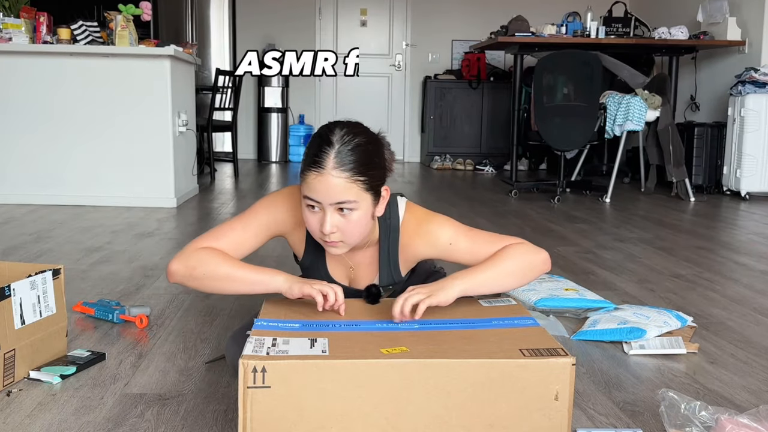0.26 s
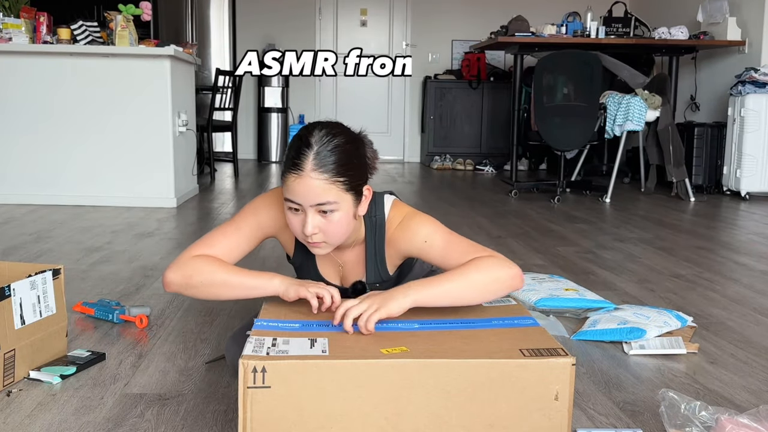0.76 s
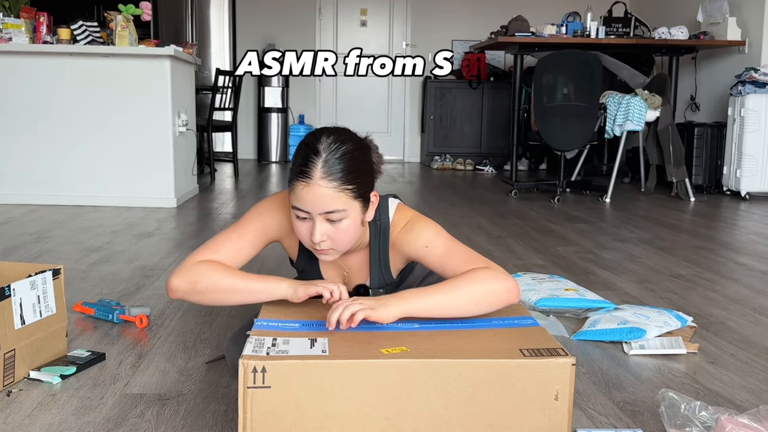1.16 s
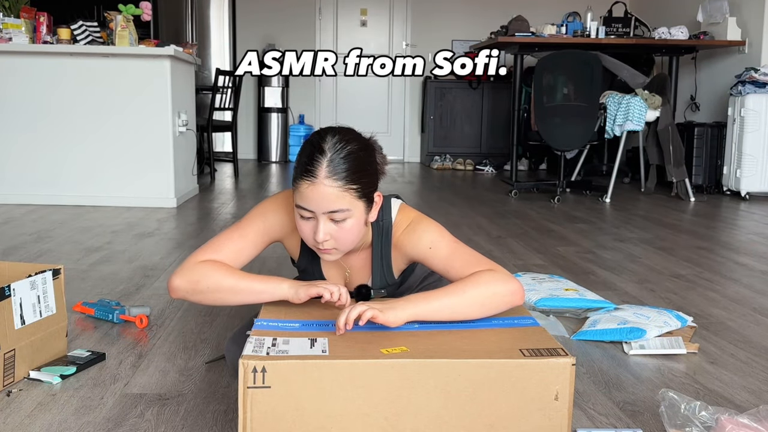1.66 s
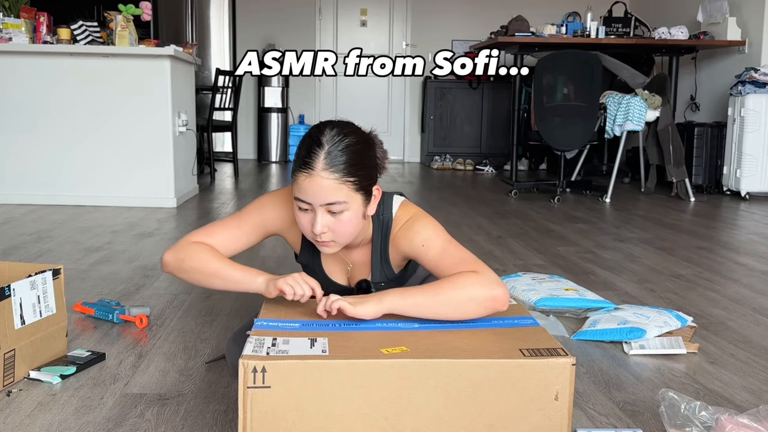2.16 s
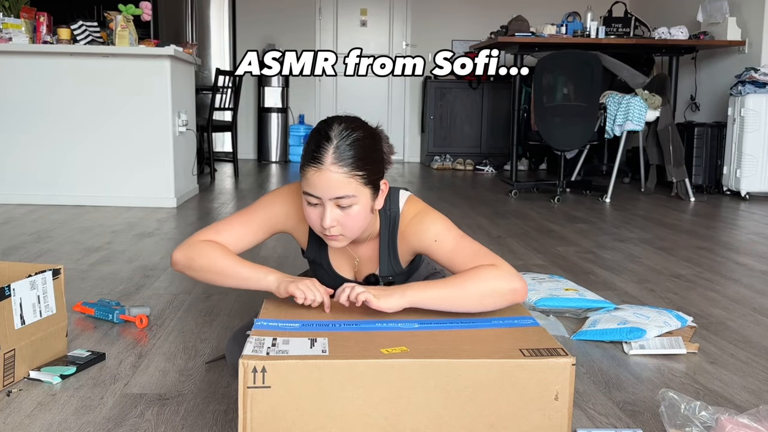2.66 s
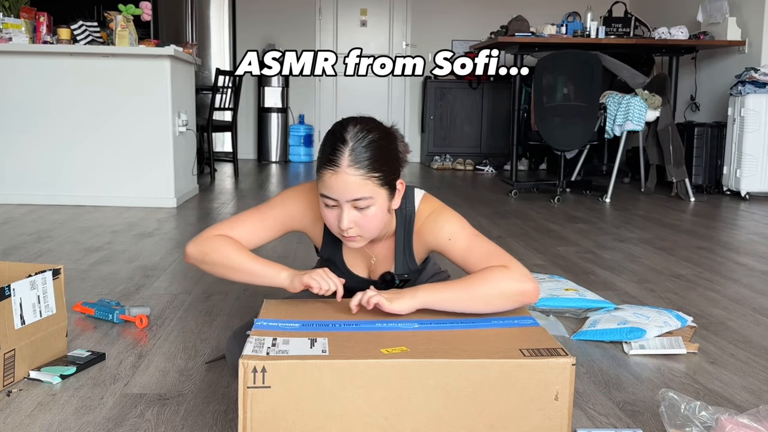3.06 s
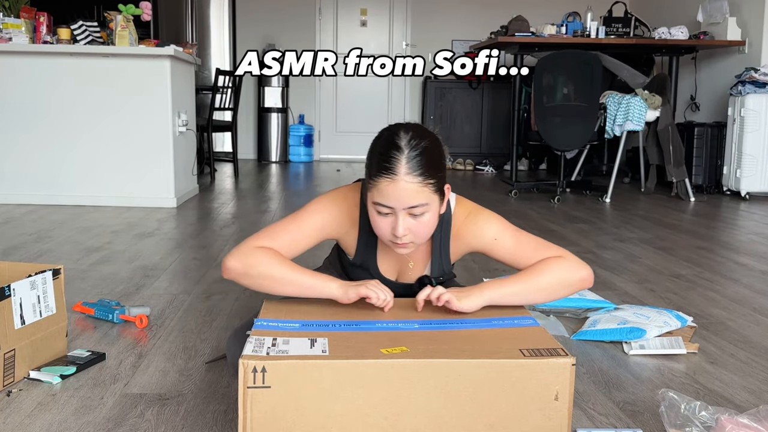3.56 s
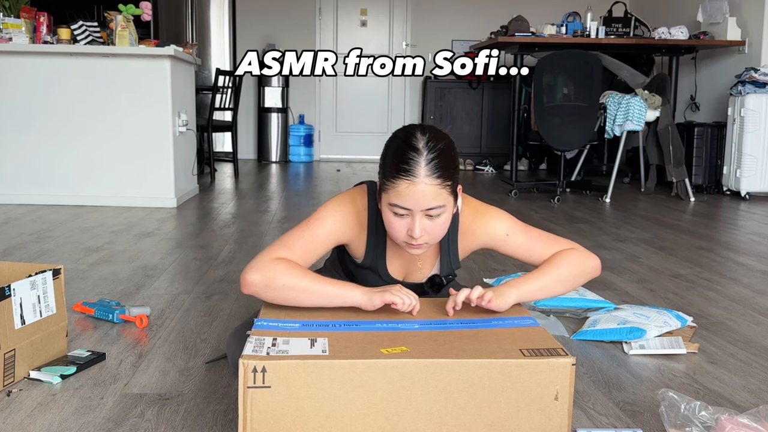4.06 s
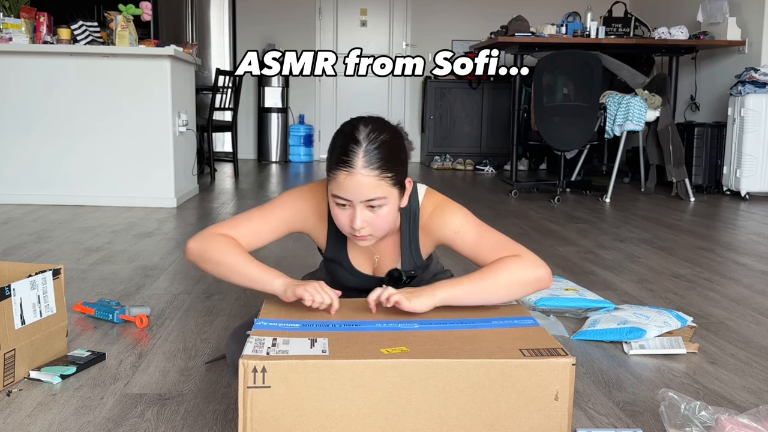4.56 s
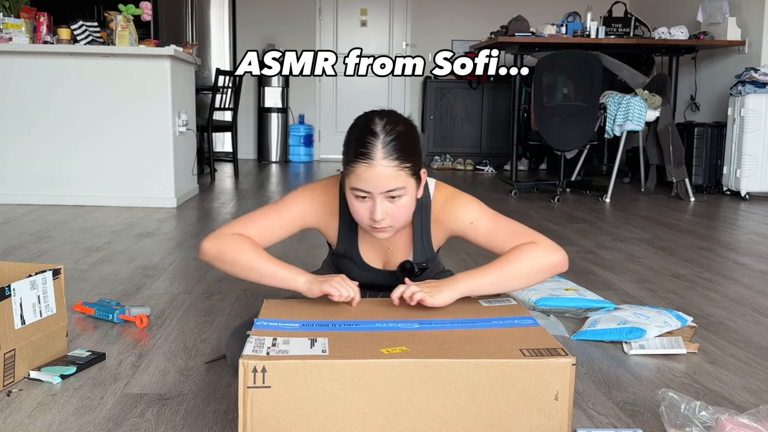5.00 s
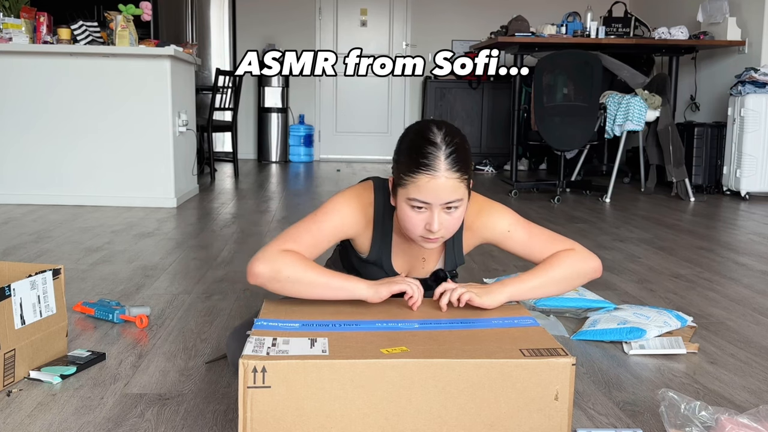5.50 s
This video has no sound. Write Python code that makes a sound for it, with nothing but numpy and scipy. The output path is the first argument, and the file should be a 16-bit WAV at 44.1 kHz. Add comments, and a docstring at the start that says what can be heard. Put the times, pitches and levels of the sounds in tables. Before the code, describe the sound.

Fingertips and nails drum hollow thumps on a large cardboard box, scratch back and forth over its ridges, then tap again, very close.

```python
"""Drumming and scratching on a cardboard box

Fingertips and nails drum on a large cardboard box, right at the microphone, in a quiet room.
Each tap dents the lid with a thump and a nail click and sets the box ringing; fingers brush the tape between.
Then the nails scratch to and fro, bumping over the flutes of the corrugated board, and the tapping starts again.
Thumps and ringing are struck resonances; brushes, drags and scratches are coloured random snaps of paper fibre."""
import sys
import numpy as np
from scipy import signal
from scipy.fft import rfft, irfft
from scipy.io import wavfile
from scipy.ndimage import uniform_filter1d

SR = 44100
rng = np.random.default_rng(int(sys.argv[2]) if len(sys.argv) > 2 else 0)


def bounce(signal):
    """Save signal as a 16-bit WAV file at the path given by the first command-line argument."""
    frames = np.transpose(np.atleast_2d(signal))
    limited = np.clip(frames, -1, 1)
    pcm = np.round(limited * 32767).astype(np.int16)
    wavfile.write(sys.argv[1], SR, pcm)


N = 252974
TIME = np.arange(N) / SR   # seconds

# taps on the lid: start_s, thump_peak_db, lid_pitch_hz, damping_octaves (width of the lid's resonance),
# click_db, click_brightness_hz (low-pass corner)
TAPS = [(.0065, -24.5, 326, 1.3, -43, 4000), (0.035, -21.5, 405, 1.38, -25, 4000),
        (.079, -20.5, 186, 1.13, -27, 4000), (0.2007, -18.5, 200, 0.77, -24.5, 3500),
        (0.2089, -21.5, 350, 0.76, -27, 2500), (0.336, -42, 270, 0.88, -53, 3020),
        (0.3816, -21.5, 336, 1.33, -20.5, 1980), (0.4288, -21, 250, 1.26, -34, 6000),
        (0.4598, -28.5, 298, 1.16, -44, 6000), (0.5664, -28, 348, 0.99, -35, 2520),
        (0.6899, -17.5, 280, 1.5, -22, 2960), (0.71, -26.5, 302, 1.4, -26, 3000),
        (.781, -25.5, 380, 1.16, -24, 4030), (.794, -32, 290, 0.73, -53, 2980),
        (0.9207, -21.5, 310, 1.07, -28, 2500), (0.9311, -22.5, 338, 0.72, -24.5, 5000),
        (1.0653, -14, 237, 1.23, -25.5, 3960), (1.1197, -30.5, 392, 1.1, -31, 6000),
        (1.3036, -12, 223, 1.29, -20, 1960), (1.4235, -19, 286, 0.49, -27.5, 7140),
        (1.507, -8.5, 232, 1.36, -15.5, 2950), (1.5912, -25.5, 310, 0.62, -30.5, 5040),
        (1.6755, -11, 243.4, 1.3, -17.5, 2950), (1.7752, -19, 290, 0.57, -22.5, 7100),
        (1.822, -11, 266, 1.24, -16.5, 2920), (2.2154, -23.5, 374, 1.38, -23, 7000),
        (2.636, -43, 220, 0.72, -41, 7000), (3.0418, -23.5, 239, 1.53, -33, 2000),
        (3.3978, -32, 370, 2.2, -55, 3020), (5.531, -29, 313, 1.42, -33.5, 5060),
        (5.6192, -22.5, 290, 0.85, -30.5, 8150), (5.6624, -15.5, 247, 1.8, -23.5, 11900),
        (5.7147, -20.5, 266, 1.36, -24.5, 9000), (5.7268, -12, 230, 1.7, -22, 14000)]
# modes of the ringing box: mode_hz, relative_level_db, t60_s
BOX_MODES = [(58.7, -32, 0.41), (86, -9, 0.19), (118.8, 7, 0.065), (167.6, -8.5, 0.22), (208.3, 8.5, 0.061),
             (256.2, 8, 0.058), (283.7, -18.5, 0.29), (326, -13, 0.054), (400, -12.5, 0.055),
             (451, 1.5, 0.068), (500, -13.5, 0.096), (632, -29, 0.11), (735, -24, 0.075), (866, -13, 0.047)]
# colour of a nail click: frequency_hz, relative_level_db
NAIL_COLOUR = [(300, -11.5), (800, -9.5), (1450, 7.5), (1700, 1), (2100, 2), (2400, 4), (3100, 3),
               (4000, -4.5), (5300, -8), (7200, -7), (10000, -18), (15000, -16.5)]

# scratches across the flutes; a nail that runs along them is hardly jolted: start_s, fastest_s, end_s,
# end_speed_flutes_per_s, top_speed_flutes_per_s, jolt_db (scaled per layer), pressure_db (upward tilt),
# then relative levels at top speed: board_db, rasp_db, hiss_db
SCRATCHES = [(2.284, 2.43, 2.499, 21.7, 38.4, 4.2, 0, -43.5, -54, -66),
             (2.498, 2.544, 2.593, 30.6, 34.4, 4.5, 0, -39.5, -54, -64.5),
             (2.68, 2.77, 2.815, 12.8, 29.7, .2, .3, -42, -53.4, -65.5),
             (2.853, 2.901, 2.947, 15.8, 29.5, .2, .5, -40.5, -54, -64.5),
             (2.98, 3.006, 3.06, 21.9, 28.5, .2, .6, -38, -56, -62.5),
             (3.074, 3.128, 3.454, 38.9, 39.9, 3.5, 1, -45, -58.5, -69.5),
             (3.451, 3.468, 3.995, 26.1, 44.1, 3.9, 3, -41.5, -53.3, -63.3),
             (4.133, 4.447, 4.679, 28.3, 61.7, 3.2, 6, -38.7, -48.6, -60.5),
             (4.682, 4.707, 4.778, 22.9, 25, 3, 0, -42, -59, -67.5),
             (4.887, 5.041, 5.46, 26.8, 38.6, 3.1, 8, -39, -50, -62.4)]
# strokes of the hand, one or more scratches each, with the spot they meet: from_s, panel_hz, panel_boost_db,
# rasp colour as pairs of frequency_hz, relative_level_db
STROKES = [(2.201, 475, 7, [(650, -31), (1100, 1.5), (1200, -24), (1230, 5.5), (1300, -1.5), (1610, 0.5),
           (1740, -5), (1920, 4), (2300, 1), (3660, -17.5), (4450, -15), (4840, -18), (5800, -26),
           (7540, -53), (12800, -120)]), (2.63, 510, 2.5, [(650, -29), (1100, 2), (1210, -4), (1460, 5.5),
           (1600, -6), (1680, -14), (1830, 4), (1930, 3), (2140, -1.5), (3230, -4.5), (3470, -3),
           (3870, -11), (4240, -6), (4640, -11.5), (5800, -14), (7540, -56), (12800, -120)]),
           (3.05, 940, 2, [(650, -22), (1100, 5), (1260, -22), (1390, 3), (1570, -1), (1740, 0),
           (2030, -4.5), (2380, -5), (2530, -9), (3040, -1.5), (4240, -9), (4740, -3.5), (5800, -20),
           (7540, -39), (12800, -120)]), (3.46, 600, 4.5, [(650, -13), (1100, 0), (1320, -2), (1680, -12),
           (1770, -13), (2000, -6.5), (2220, -9.5), (2550, -14), (2950, -7), (3390, -10), (3960, -16.5),
           (4640, -14), (5800, -24), (7540, -49), (12800, -120)]), (4.08, 515, 3.5, [(650, -54), (1100, 4),
           (1280, -7), (1510, -8), (1770, 1), (2090, -3), (2280, 3.5), (2760, -0.5), (3120, 1.5),
           (3720, -5), (4550, -11.5), (5340, -12), (5800, -16), (7540, -55), (12800, -120)]),
           (4.82, 615, 5.5, [(650, -17), (1100, -2), (1150, -4.5), (1430, 4.5), (1580, -3.5), (2070, -4.5),
           (2300, -6), (2480, -9), (2910, -4.5), (3210, -14.5), (3820, -13.5), (4300, -16), (4710, -23),
           (5230, -23), (5800, -29), (7540, -63), (12800, -120)])]
# friction colour of the drumming board: frequency_hz, relative_level_db (per Hz)
BOARD_COLOUR = [(21, -49), (35, -38), (85, -13), (117, -8), (177, -4), (286, 3), (438, -4), (494, -0.5),
                (541, -8), (668, -9), (789, -13), (904, -8.5), (1120, -25), (1300, -24.5), (1690, -31.5),
                (2860, -120)]
# friction colour at the nail's edge: frequency_hz, relative_level_db (per Hz)
HISS_COLOUR = [(3240, -24), (5500, 0.5), (8000, -5), (11300, -14.5), (13600, -13), (15600, -18)]

# short brushes of a nail over the packing tape: centre_s, half_length_s, level_db
BRUSHES = [(0.302, 0.006, -55), (0.441, 0.022, -47.5), (0.499, 0.0058, -47), (0.726, 0.021, -58.5),
           (0.785, 0.029, -57), (0.893, 0.0099, -54), (1.018, 0.01, -51.5), (1.145, 0.0092, -54.5),
           (1.871, 0.0058, -57.5), (2.232, 0.003, -49.5), (5.684, 0.0053, -61)]
# tiny tones: centre_s, half_length_s, pitch_hz, level_db; the first is a brief 2240 Hz ring just after the tap
# at 0.079 s, the second a squeak as the nail catches on the tape
TONES = [(.0803, .002, 2240, -36), (.449, .015, 3120, -48)]
# friction colour of the tape: frequency_hz, relative_level_db (per Hz)
TAPE_COLOUR = [(410, -60.5), (700, 6), (968, 1), (1210, -8), (2220, -8.5), (2630, -13), (3070, -5.5),
               (3370, -11.5), (6030, -22), (7620, -19.5), (15600, -37)]

# light fingertip drags among and under the taps and scratches: centre_s, half_length_s,
# then relative levels: board_db, rasp_db, hiss_db
DRAGS = [(.01, 0.078, -38, -55, -61), (.11, .13, -54.5, -63, -62.5), (.3, 0.11, -50.5, -63.5, -65.5),
         (.52, 0.078, -46.5, -67, -66), (.74, 0.097, -40.5, -71, -75), (1.08, 0.16, -53.5, -73, -72),
         (1.97, 0.12, -58, -72.5, -71.5), (2.27, 0.042, -45.5, -68, -72), (2.675, 0.033, -50, -63.5, -69),
         (3.02, 0.019, -48, -76, -57), (3.69, 0.038, -54, -55.5, -61), (4.06, 0.33, -51.5, -67.5, -62),
         (4.12, 0.02, -44.5, -85, -78), (4.85, 0.072, -45.5, -71.5, -67.5), (5.45, 0.0088, -45, -52, -50),
         (5.505, 0.022, -46.5, -74, -67)]
# rasp colour of a light drag: frequency_hz, relative_level_db (per Hz)
DRAG_RASP_COLOUR = [(680, -50), (1150, 3.5), (1550, -2), (1960, -0.5), (3200, -1), (3510, -5.5),
                    (3840, -0.5), (5800, -14.5), (7540, -46), (12800, -120)]

# forearms leaning and shifting on the lid: centre_s, half_length_s, rumble_db
LEANS = [(.1, 0.7, -62), (2.75, 0.23, -75), (3.4, 0.48, -77), (4.5, 0.29, -58.5)]
# colour of the room's answer: frequency_hz, relative_level_db
ROOM_COLOUR = [(40, -4), (120, -5.5), (400, 0.5), (1000, 1), (4000, -0.5), (15000, 1.5)]
# colour of the room's hush: frequency_hz, relative_level_db (per Hz)
HUSH_COLOUR = [(30, -11.5), (60, -23), (140, 4), (420, -18.5), (800, -7), (1400, -18), (4300, -24.5),
               (9000, -33), (16000, -40)]

# the box rings louder after a harder tap, and less if the finger stays on the lid
RING_DB, RING_DB_PER_THUMP_DB, MUTING_DB_PER_OCTAVE = -10.5, 0.69, 8.5
# each layer's amplitude grows with speed to this power
BOARD_POWER, RASP_POWER, HISS_POWER = 1.15, 1.94, 1.36
LIFT_S = 0.017   # time constant of the nail settling on the board and leaving it
LIGHT_TILT_DB = -4   # a light touch sounds duller: upper part of the board down, lower part up
HUSH_DB, CUTOFF_HZ = -69, 15700


def thumps():
    """The lid gives way and springs back: one swing if the finger stays on it, several if it bounces off."""
    out = np.zeros(N)
    for start_s, thump_db, pitch_hz, octaves, *_ in TAPS:
        ratio = 2 ** (max(octaves, .1) / 2)
        lid = signal.butter(2, [pitch_hz / ratio, pitch_hz * ratio], "band", fs=SR, output="sos")
        swing = signal.sosfilt(lid, signal.unit_impulse(SR // 10))
        # the minus sign makes the first swing inward
        add(out, start_s, -from_db(thump_db) * swing / np.abs(swing).max())
    return out


def box_ring(uneven_db=2.5, detune=0.014, build_s=0.00085):
    """The bending wave spreads through the box; each tap favours and bends its modes at random."""
    out = np.zeros(N)
    t = np.arange(SR // 2) / SR
    mode_hz, mode_db, t60_s = np.transpose(BOX_MODES)[:, :, None]
    build_up = (1 - np.exp(-t / build_s)) ** 2
    chance = rng.standard_normal((len(TAPS), 3, len(BOX_MODES), 1))
    for (start_s, thump_db, _, octaves, *_), (strength, bend, lag) in zip(TAPS, chance):
        ring_db = RING_DB + RING_DB_PER_THUMP_DB * thump_db - MUTING_DB_PER_OCTAVE * octaves
        heights = from_db(ring_db + mode_db + uneven_db * strength - 60 * t / t60_s)
        bent_hz = mode_hz * (1 + detune * bend)
        modes = heights * np.sin(2 * np.pi * bent_hz * t + np.pi * lag)
        add(out, start_s, modes.sum(0) * build_up)
    return out


def nail_clicks(crunch=0.19, crunch_t60_s=0.01, rattle=0.0091, rattle_t60_s=0.086):
    """The hard nail edge lands with a click; crushed fibres and the tape crackle just after."""
    out = np.zeros(N)
    t = np.arange(SR // 10) / SR
    fading = crunch * from_db(-60 * t / crunch_t60_s) + rattle * from_db(-60 * t / rattle_t60_s)
    crackles = rng.standard_normal((len(TAPS), len(t)))
    for (start_s, *_, click_db, bright_hz), crackle in zip(TAPS, crackles):
        click = low_pass(crackle * fading - signal.unit_impulse(len(t)), bright_hz)
        add(out, start_s, from_db(click_db) * click)
    return colour(out, NAIL_COLOUR)


def scratching(knock=1.64, tick=1.3, panel_width_hz=130, board_db=0.1, rasp_db=0.17, hiss_db=-0.36):
    """Snapping fibres and knocks on the flutes drive the resonances of the spot being scratched."""
    crossed, swing_db, tilt_db, gains = scratch_motion()
    shoves = grains(per_s=3000, spread_db=1.5) * flute_jolts(crossed, swing_db, share=0.83)
    shoves = rms_one(shoves + knock * flute_ticks(crossed, swing_db))
    snaps = grains(per_s=7000, spread_db=3.0) * flute_jolts(crossed, swing_db, share=1.2)
    snaps = rms_one(snaps + tick * flute_ticks(crossed, swing_db))
    drumming = colour(shoves, BOARD_COLOUR)
    stroke_now = np.searchsorted([stroke[0] for stroke in STROKES], TIME) - 1
    board, rasp = np.zeros((2, N))
    for k, (_, panel_hz, boost_db, rasp_colour) in enumerate(STROKES):
        panel = drumming + (from_db(boost_db) - 1) * resonance(drumming, panel_hz, panel_width_hz)
        active = uniform_filter1d((stroke_now == k).astype(float), SR // 50)   # crossfade in 20 ms
        board += active * rms_one(panel)
        rasp += colour(active * snaps, rasp_colour)
    hiss = hand_echo(colour(snaps, HISS_COLOUR))
    return friction(gains, tilt_db, from_db(board_db) * board, from_db(rasp_db) * rasp,
                    from_db(hiss_db) * hiss)


def scratch_motion():
    """Each scratch speeds up and slows down in one arch; speed sets the flute rate, the loudness and the tilt."""
    crossed, swing_db, tilt_db = np.zeros((3, N))
    power = np.zeros((3, N))
    laws = np.array([[BOARD_POWER], [RASP_POWER], [HISS_POWER]])
    for start_s, fastest_s, end_s, slow, top, jolt_db, pressure_db, *layers_db in SCRATCHES:
        arch = np.sin(np.interp(TIME, [start_s, fastest_s, end_s], [0, np.pi / 2, np.pi]))
        speed = slow + (top - slow) * arch
        touching = np.exp(-np.abs(TIME - np.clip(TIME, start_s, end_s)) / LIFT_S)
        layer_gains = from_db(layers_db)[:, None] * touching * (speed / top) ** laws
        power += layer_gains ** 2
        # the newest scratch takes over the flute count, the jolts and the tilt
        current = TIME >= start_s - LIFT_S / 2
        travelled = np.cumsum(speed) / SR
        crossed = np.where(current, travelled - np.interp(start_s, TIME, travelled), crossed)
        swing_db = np.where(current, jolt_db * touching, swing_db)
        pressed_db = LIGHT_TILT_DB + (pressure_db - LIGHT_TILT_DB) * touching * speed / top
        tilt_db = np.where(current, pressed_db, tilt_db)
    return crossed, swing_db, tilt_db, np.sqrt(power)


def flute_jolts(crossed, swing_db, share, peaked=0.3, steep=0.17):
    """Friction jumps each time the nail meets a flute, then eases; divided by its running rms over 0.1 s."""
    turn = 2 * np.pi * crossed
    ridge = np.cos(turn) + peaked * np.cos(2 * turn) + steep * (np.sin(2 * turn) + np.sin(3 * turn))
    heights = 1 + .17 * rng.standard_normal(int(crossed.max()) + 1)   # uneven flutes
    height_now = np.interp(crossed, np.arange(len(heights)), heights)
    surge = from_db(share * swing_db * ridge * height_now)
    return surge / np.sqrt(uniform_filter1d(surge ** 2, SR // 10))


def flute_ticks(crossed, swing_db, uneven_db=3.0):
    """The nail knocks against each crest, as hard as the flutes jolt it, give or take some decibels."""
    ticks = np.zeros(N)
    crests = np.flatnonzero(np.diff(np.floor(crossed)) > 0)
    ticks[crests] = swing_db[crests] * from_db(uneven_db * rng.standard_normal(len(crests)))
    return ticks


def hand_echo(x, near_s=0.00037, far_s=0.00063, share=0.11):
    """The curled hand reflects the hiss; it closes in during each stroke, so the comb of peaks slides upward."""
    starts = [stroke[0] for stroke in STROKES] + [TIME[-1]]
    progress = np.interp(TIME, starts, np.arange(len(starts))) % 1
    lag_s = far_s + (near_s - far_s) * progress
    echo = np.interp(TIME - lag_s, TIME, x)
    return (x + share * echo) / np.sqrt(1 + share ** 2)


def brushes(squeak_width_hz=130):
    """A nail skids briefly over the packing tape; now and then a short tone rings or squeaks with a wavering
    phase."""
    out = colour(swells(BRUSHES, 2) * grains(per_s=17000, spread_db=3.0), TAPE_COLOUR)
    for centre_s, half_s, pitch_hz, level_db in TONES:
        wander = np.cumsum(rng.standard_normal(N)) * np.sqrt(2 * np.pi * squeak_width_hz / SR)
        swell = from_db(level_db) * np.exp(-((TIME - centre_s) / half_s) ** 2)
        out += swell * np.sin(2 * np.pi * pitch_hz * TIME + wander)
    return out


def sliding(board_db=-3.5, rasp_db=0.04, hiss_db=-7.0):
    """Fingers drag lightly over the lid, snapping fibres that sound in board, rasp and hiss."""
    snaps = grains(per_s=6400, spread_db=3.5)
    board = from_db(board_db) * colour(grains(per_s=3000, spread_db=4.5), BOARD_COLOUR)
    rasp = from_db(rasp_db) * colour(snaps, DRAG_RASP_COLOUR)
    hiss = from_db(hiss_db) * colour(snaps, HISS_COLOUR)
    gains = [swells(DRAGS, column) for column in (2, 3, 4)]
    return friction(gains, LIGHT_TILT_DB, board, rasp, hiss)


def friction(gains, tilt_db, board, rasp, hiss, pivot_hz=500):
    """Mix drumming board, rasping liner and hiss at the nail's edge; pressure shifts the board's sound upward."""
    board_gain, rasp_gain, hiss_gain = gains
    lift = from_db(tilt_db)
    deep = low_pass(board, pivot_hz)
    tilted = deep / lift + (board - deep) * lift
    tilted = tilted / np.sqrt((lift ** 2 + 1 / lift ** 2) / 2)
    return tilted * board_gain + rasp * rasp_gain + hiss * hiss_gain


def grains(per_s, spread_db):
    """Paper fibres snap under the nail or fingertip at random moments, in uneven sizes; rms 1."""
    sizes = from_db(spread_db * np.minimum(rng.exponential(1, N), 4))
    signs = rng.choice([-1, 1], N)
    snapping = rng.random(N) < per_s / SR
    return rms_one(sizes * signs * snapping)


def lid_rumble(hz=58, width_hz=50):
    """The whole lid sways slowly under the arms: noise through two equal resonances."""
    sway = resonance(resonance(rng.standard_normal(N), hz, width_hz), hz, width_hz)
    return swells(LEANS, 2) * rms_one(sway)


def room(x, t60_s=0.38, wet_db=-21, first_s=0.009):
    """A faint diffuse answer from floor and walls: a decaying noise tail."""
    t = np.arange(SR) / SR
    tail = rng.standard_normal(SR) * from_db(-60 * t / t60_s) * (t > first_s)
    answer = signal.oaconvolve(x, tail / np.linalg.norm(tail))[:N]
    return from_db(wet_db) * colour(answer, ROOM_COLOUR)


def room_hush():
    """The steady hush of the quiet room: coloured noise."""
    return from_db(HUSH_DB) * colour(rng.standard_normal(N), HUSH_COLOUR)


def from_db(db):
    """Decibels to gain."""
    return 10 ** (np.asarray(db) / 20)


def rms_one(x):
    """Scale to unit rms."""
    return x / np.sqrt(np.mean(x ** 2) + 1e-20)


def add(track, start_s, sound):
    """Mix a sound into the track from start_s on."""
    start = int(np.clip(round(start_s * SR), 0, N - 1))
    track[start:start + len(sound)] += sound[:N - start]


def swells(events, column):
    """Smooth rise and fall around each event (centre_s, half_length_s, ...), up to the dB in the given column."""
    return sum(from_db(row[column]) * np.exp(-((TIME - row[0]) / row[1]) ** 2) for row in events)


def colour(x, spectrum, size=4096):
    """Causal (minimum-phase) filter with the given spectrum; white noise keeps its power."""
    hz, db = np.transpose(spectrum)
    grid_hz = np.maximum(np.arange(size // 2 + 1) * SR / size, 1)
    gain = from_db(np.interp(np.log(grid_hz), np.log(hz), db))
    # folding the cepstrum onto positive time gives the minimum phase
    cepstrum = irfft(np.log(gain))
    cepstrum[1:size // 2] *= 2
    cepstrum[size // 2 + 1:] = 0
    response = irfft(np.exp(rfft(cepstrum)))
    return signal.oaconvolve(x, response / np.linalg.norm(response))[:N]


def low_pass(x, hz, order=1):
    """Gentle Butterworth low-pass."""
    return signal.sosfilt(signal.butter(order, min(hz, SR / 2 - 1), fs=SR, output="sos"), x)


def resonance(x, hz, width_hz):
    """One two-pole resonance, gain about 1 on top."""
    r = np.exp(-np.pi * width_hz / SR)
    feed = (1 - r * r) / 2 * np.array([1, 0, -1])
    return signal.lfilter(feed, [1, -2 * r * np.cos(2 * np.pi * hz / SR), r * r], x)


def scene():
    """Taps, brushes, drags and scratches on the box, over the hush of the room."""
    taps = thumps() + box_ring() + nail_clicks()
    rubbing = scratching() + brushes() + sliding()
    box = taps + rubbing + lid_rumble()
    return (box + room(box) + room_hush())[None]


def record(dry):
    """The deepest bass, below 42 Hz, is taken away; a steep low-pass cuts the top."""
    lean = signal.sosfilt(signal.butter(3, 42, "high", fs=SR, output="sos"), dry)
    return signal.sosfilt(signal.ellip(10, .1, 80, CUTOFF_HZ, fs=SR, output="sos"), lean)


dry = scene()
out = record(dry)
bounce(out)
```